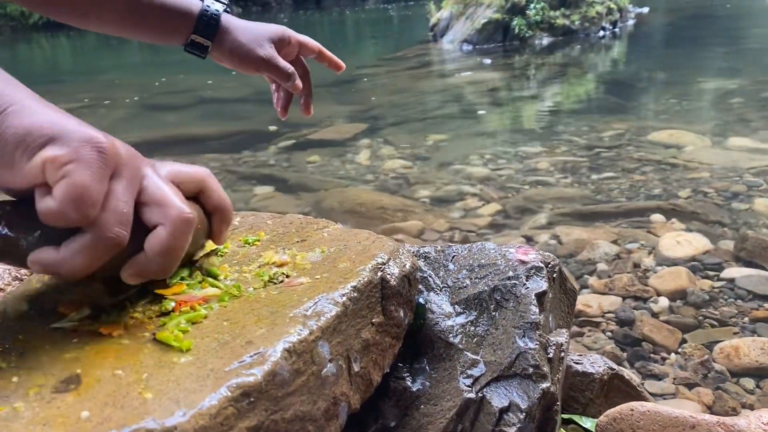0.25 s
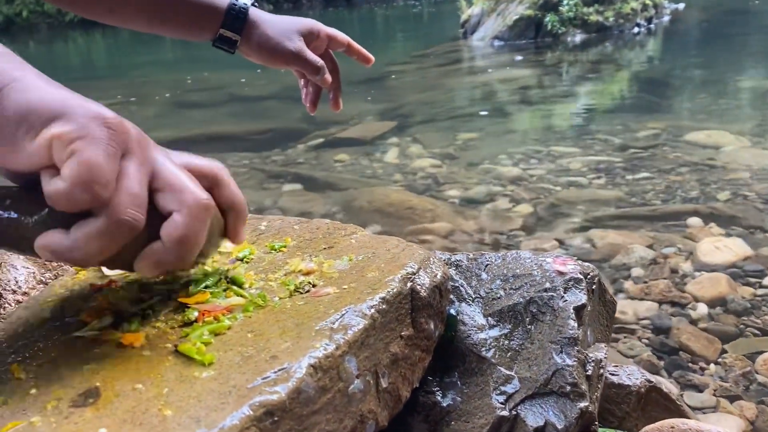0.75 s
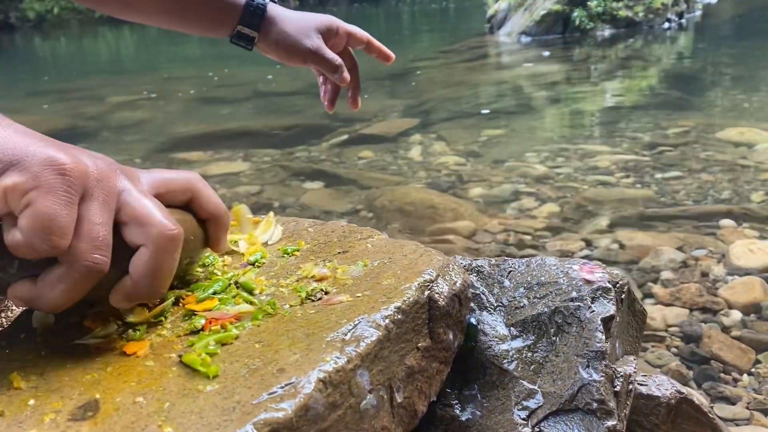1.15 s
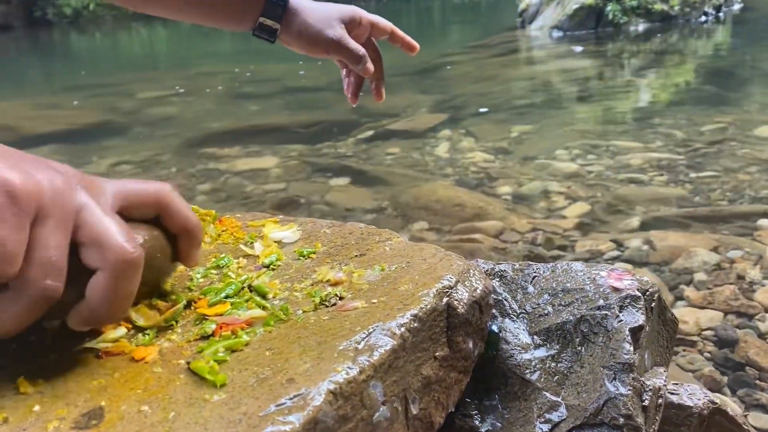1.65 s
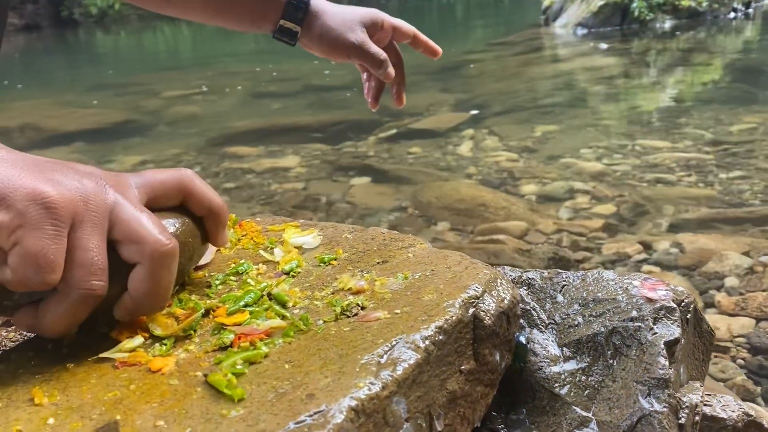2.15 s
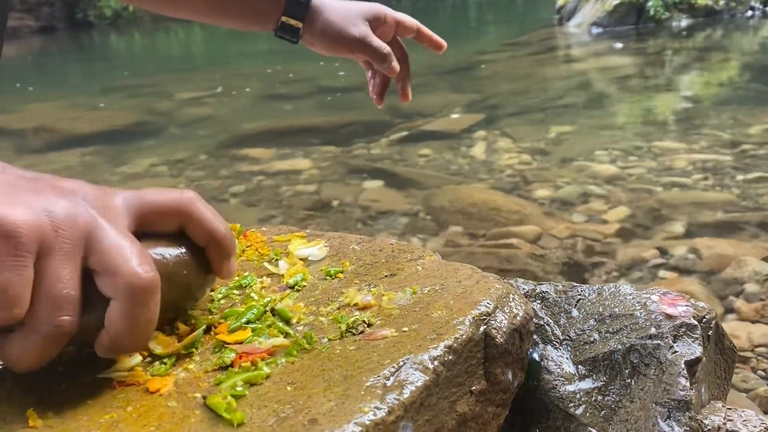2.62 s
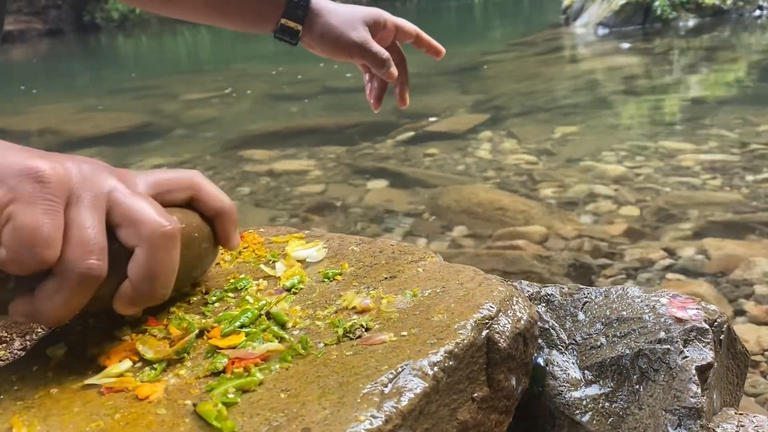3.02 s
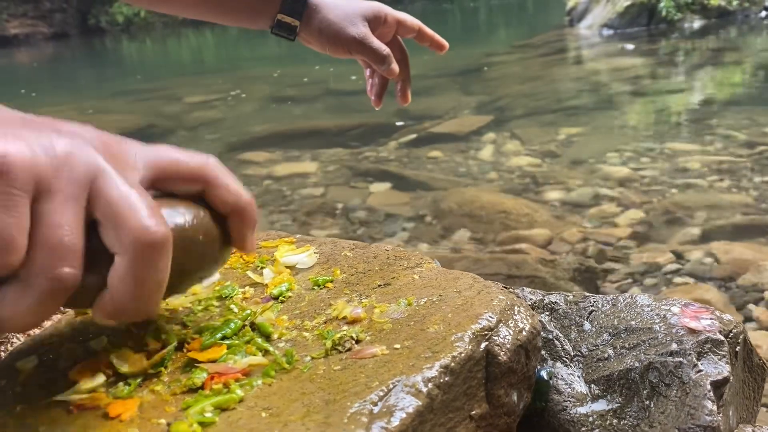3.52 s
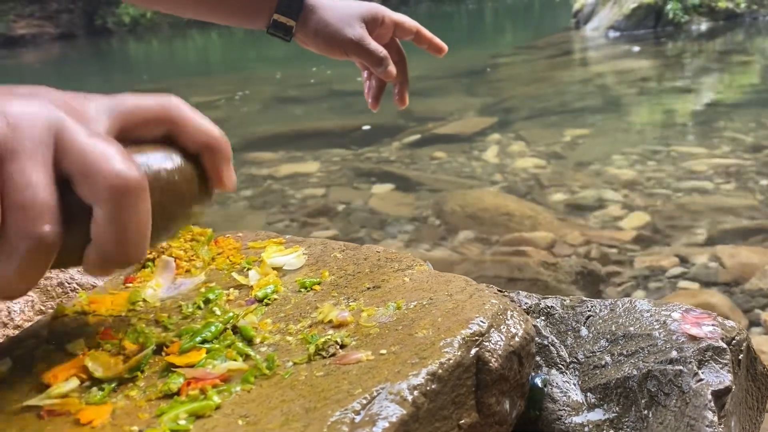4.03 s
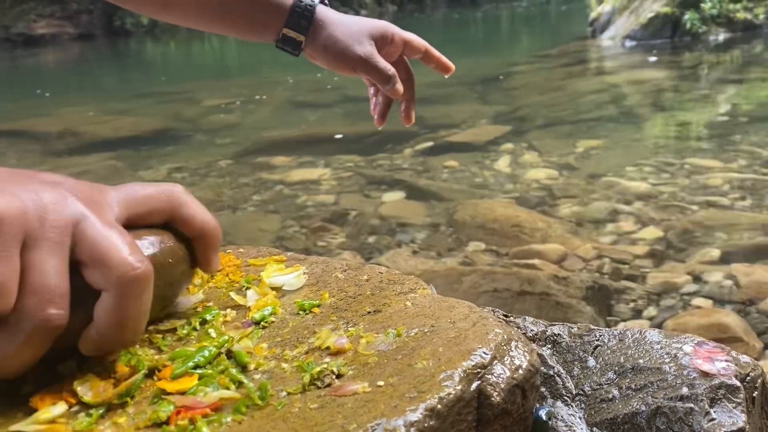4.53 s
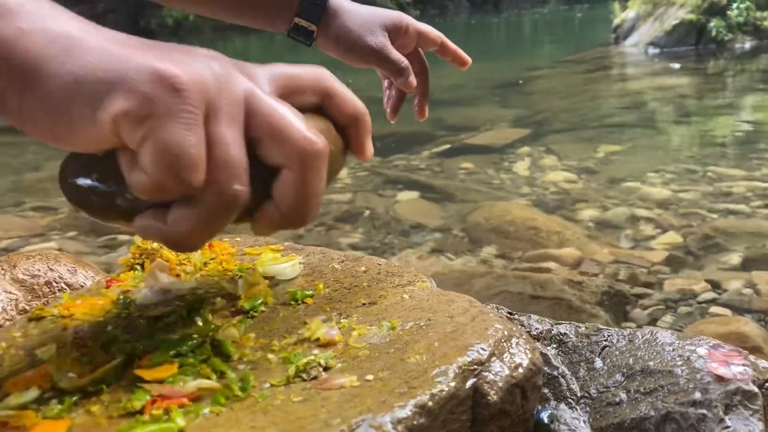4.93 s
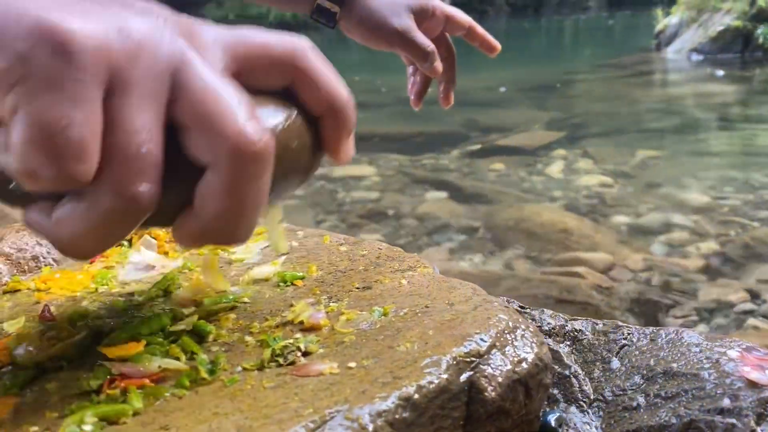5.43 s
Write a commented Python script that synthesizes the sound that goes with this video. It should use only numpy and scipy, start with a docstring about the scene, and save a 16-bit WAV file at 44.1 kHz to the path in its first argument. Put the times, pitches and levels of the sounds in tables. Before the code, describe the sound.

Dull thuds and sharper stone clacks crunch through moist pulp about twice a second, with a low river rumble and insect hiss behind.

```python
"""Stone pounding spices by a river

A hand-held stone pounds fresh spices on a flat rock; a shallow river and shrilling insects lie behind.
Each blow is a noise-burst crunch, a thud falling in pitch, a rocking slab and a clack of ringing modes.
River and chorus are shaped noise; single insects are blurred tones, the drone a narrow noise band.
The hardest blows drive a limiter, so the river sinks and swells back after them."""
import sys
import numpy as np
from scipy import signal
from scipy.fft import rfft, irfft
from scipy.io import wavfile
from scipy.ndimage import uniform_filter1d, minimum_filter1d

SR = 44100
rng = np.random.default_rng(int(sys.argv[2]) if len(sys.argv) > 2 else 0)


def to_wav(s):
    """Save 16-bit WAV."""
    ch = np.atleast_2d(s).T  # columns
    pcm = np.round(np.clip(ch, -1, 1) * 32767)  # PCM
    wavfile.write(sys.argv[1], SR, pcm.astype(np.int16))


N = 250047
TIME = np.arange(N) / SR
FREQ_HZ = np.fft.rfftfreq(N, 1 / SR)


def from_db(db):
    """Decibels to gain."""
    return 10 ** (np.asarray(db) / 20)


def rms_one(x):
    """Scale to unit rms."""
    return x / np.sqrt(np.mean(x ** 2) + 1e-20)


def blend(first, second, share):
    """Go from the first value to the second as share goes from 0 to 1."""
    return first + (second - first) * share


def at_hz(points, size=N):
    """Interpolate a (freq_hz, value) table over log frequency, on the grid of a signal of this size."""
    hz, value = np.transpose(points)
    grid_hz = np.fft.rfftfreq(size, 1 / SR) + 1
    return np.interp(np.log(grid_hz), np.log(hz), value)


def coloured(x, spectrum):
    """Filter by a (freq_hz, level_db) table."""
    size = x.shape[-1]
    return irfft(rfft(x) * from_db(at_hz(spectrum, size)), size)


def pan(balance_db):
    """Left and right gains for a left-minus-right level difference."""
    return from_db(np.array([[.5], [-.5]]) * balance_db)


def stereo(pair, likeness):
    """Two unrelated signals become left and right with the given correlation."""
    c = np.clip(likeness, -1, 1)
    shared = np.sqrt(1 + c) * pair[0]
    opposed = np.sqrt(1 - c) * pair[1] * [[1], [-1]]
    return (shared + opposed) / np.sqrt(2)


def drift(rate_hz):
    """Random wander of unit spread, mostly slower than rate_hz."""
    lowpass = 1 / (1 + (FREQ_HZ / rate_hz) ** 2)
    return rms_one(irfft(rfft(rng.standard_normal(N)) * lowpass, N))


def ring(x, hz, t60_s):
    """Damped two-pole resonance: a unit click sets a mode of height 1 ringing."""
    r = from_db(-60 / (t60_s * SR))
    w = 2 * np.pi * hz / SR
    return signal.lfilter([1, -r * np.cos(w)], [1, -2 * r * np.cos(w), r * r], x + 1e-18)


def clicks(contact_s, level_db):
    """The impulse of a contact."""
    out = np.zeros(N)
    out[int(contact_s * SR)] = from_db(level_db)
    return out


def add(out, sound, centre_s):
    """Mix a short sound in around a moment."""
    start = int(centre_s * SR) - sound.shape[-1] // 2
    out[:, start:start + sound.shape[-1]] += sound


# blows, one bouncing at 2.44 s: contact_s, force_db, crunch_db, crunch_tilt_db_per_octave
BLOWS = [(0.1334, -13, -23.5, 2.5), (0.567, -5, -21, 1.5), (1.0050, -35, -21.5, 0.5),
         (1.5590, -42, -26.5, 4), (2.0116, -18, -15, 4), (2.4359, 5.5, -11, -1), (2.4427, 0, -30, -1),
         (2.8826, -4.5, -17, -1.8), (3.3036, -22, -21, 2), (3.7259, -15, -20.5, -0.5),
         (4.1472, 0, -12.5, .3), (4.545, 7, -9, 0.5), (5.0269, -13.5, -16, 2)]
# stone rubbing and settling in the pulp: centre_s, scuff_db, wet_tick_db, half_length_s
SQUISHES = [(1.027, -50, -39, .004), (1.072, -40.5, -52, 0.0074), (1.125, -37.5, -50, 0.0069),
            (1.153, -42.5, -61, 0.016), (1.571, -45, -46, .004), (5.128, -52, -47, 0.0034)]
# a blow harder than BARE_FORCE_DB squeezes through the paste to bare stone
BARE_FORCE_DB, BARE_RANGE_DB = -1.5, 1.27
PASTE_CONTACT_HZ, BARE_CONTACT_HZ = 1630, 3550  # low-pass of the clack
PASTE_LEAD_S, BARE_LEAD_S = .0018, 0.000885  # crunch centre ahead of stone contact
PASTE_CRUSH_S, BARE_CRUSH_S = .0013, 0.0011  # crunch half-length
PASTE_THUD_RATIO, BARE_THUD_RATIO = 2.08, 2.27  # thud start pitch over THUD_HZ
THUD_HZ = 405.5  # pitch the thud settles on
CLACK_DB, CLACK_GROWTH = -0.5, 1.64  # at force 0 dB; dB per dB of force


def pounding():
    """Force shapes each blow's crunch, thud, rocking and clack; the pulp squishes between; rocks reflect."""
    direct = np.zeros((2, N))
    for contact_s, force_db, crunch_db, tilt_db in BLOWS:
        bare = 1 / (1 + np.exp((BARE_FORCE_DB - force_db) / BARE_RANGE_DB))
        thud_ratio = blend(PASTE_THUD_RATIO, BARE_THUD_RATIO, bare)
        contact_hz = blend(PASTE_CONTACT_HZ, BARE_CONTACT_HZ, bare)
        clack_click = clicks(contact_s, CLACK_DB + CLACK_GROWTH * force_db)
        direct += thud(clicks(contact_s, force_db), THUD_HZ, thud_ratio) * pan(balance_db=-2.5)
        direct += rocking(contact_s, force_db) * pan(balance_db=-5.5)
        direct += clack(clack_click, contact_hz) * pan(balance_db=-2.0)
        pulp = crunch(crunch_db, tilt_db, blend(PASTE_CRUSH_S, BARE_CRUSH_S, bare))
        add(direct, pulp, contact_s - blend(PASTE_LEAD_S, BARE_LEAD_S, bare))
    for centre_s, scuff_db, tick_db, half_length_s in SQUISHES:
        tick = crunch(tick_db, tilt_db=-2.0, half_length_s=half_length_s)
        add(direct, scuff(scuff_db, half_length_s) + tick, centre_s)
    return direct + glance(direct) + scatter(direct, t60_s=0.036, level_db=-8, delay_s=0.00395)


def thud(blow, end_hz, start_ratio, glide_s=.0021, crest_s=.0025, width_s=0.0013):
    """The slab answers with a few cycles that fall in pitch: its higher bending waves arrive first."""
    t = TIME[:SR // 40]
    pitch_hz = end_hz * (1 + (start_ratio - 1) * np.exp(-t / glide_s))
    phase = 2 * np.pi * np.cumsum(pitch_hz) / SR
    onset = 1 - np.exp(-t / 0.00017)
    swell = np.exp(-.5 * ((t - crest_s) / width_s) ** 2) * onset
    return signal.oaconvolve(blow, np.cos(phase) * swell)[:N]


# ring of stone on stone: mode_hz, level_db, t60_s
STONE_MODES = [(1030, -15.5, 0.011), (1310, -15.5, 0.011), (1622, -11.5, 0.0098), (1870, -19.5, 0.0096),
               (2084, -9.5, 0.015), (2380, -13, 0.0091), (2900, -17.5, 0.037), (3100, -24, 0.016),
               (3250, -12, 0.035), (3600, -21, .016)]


def clack(blow, contact_hz, spread_db=0.5):
    """Contact rings the stones, a little differently at each spot; a film of paste takes off the upper modes."""
    modes = np.zeros(N)
    for hz, level_db, t60_s in STONE_MODES:
        modes += from_db(level_db + rng.normal(0, spread_db)) * ring(blow, hz, t60_s)
    lowpass = signal.butter(4, contact_hz, fs=SR, output="sos")
    return signal.sosfilt(lowpass, modes)


# bursting pulp: freq_hz, level_db
CRUNCH = [(700, -10), (1500, -9.5), (2300, -0.5), (4000, -2.5), (6000, 0.5), (7300, 3.5), (9000, -7.5),
          (12500, -0.5), (15000, -3.5), (16500, -17)]


def crunch(level_db, tilt_db, half_length_s, grain_db=5.0, spatter_db=-18, spatter_s=0.0054, likeness=0.93):
    """Cells burst and juice squirts as the gap closes, then a little spatter; 0.1 s, loudest in the middle."""
    t = TIME[:SR // 10] - TIME[SR // 20]
    squeeze = np.exp(-(t / half_length_s) ** 2)
    spatter = from_db(spatter_db) ** 2 * (t > 0) * np.exp(-abs(t) / spatter_s)
    envelope = np.sqrt(squeeze + spatter)  # powers add
    unevenness = np.clip(rng.standard_normal(len(t)), -2, 2)
    grains = rng.standard_normal((2, len(t))) * from_db(grain_db * unevenness)
    colour = [(hz, db + tilt_db * np.log2(hz)) for hz, db in CRUNCH]
    burst = rms_one(coloured(stereo(grains, likeness), colour))
    return from_db(level_db) * envelope * burst


# slab rocking on its bed: mode_hz, level_db, t60_s
SLAB_MODES = [(91, -6.5, 0.11), (178, -3.5, 0.069), (231, -1.5, 0.045), (303.6, 1.5, 0.055)]


def rocking(contact_s, force_db, level_db=-20, growth=0.38, push_hz=500, lag_s=0.00405):
    """The weight of the hand follows each blow and rocks the slab, varying less than the force does."""
    click = clicks(contact_s + lag_s, level_db + growth * force_db)
    push = signal.sosfilt(signal.butter(2, push_hz, fs=SR, output="sos"), click + 1e-18)
    return sum(from_db(db) * ring(push, hz, t60_s) for hz, db, t60_s in SLAB_MODES)


def scuff(level_db, half_length_s, low_hz=470, high_hz=720):
    """Friction through the paste gives a dull rub, a noise band of 470-720 Hz; 0.1 s, loudest in the middle."""
    t = TIME[:SR // 10] - TIME[SR // 20]
    band = signal.butter(2, [low_hz, high_hz], "band", fs=SR, output="sos")
    rub = rms_one(signal.sosfilt(band, rng.standard_normal(len(t))))
    return from_db(level_db) * np.exp(-.5 * (t / half_length_s) ** 2) * rub


def glance(x, left_s=0.00119, right_s=.0028, level_db=-12, low_hz=900):
    """The rock face throws the upper range back, by a different path to each microphone."""
    upper = signal.sosfilt(signal.butter(2, low_hz, "high", fs=SR, output="sos"), x)
    left = np.interp(TIME - left_s, TIME, upper[0])
    right = np.interp(TIME - right_s, TIME, upper[1])
    return from_db(level_db) * np.array([left, right])


# dull scatter from the ground and rocks around: freq_hz, level_db
SCATTER = [(60, -9), (160, -8), (320, 5.5), (600, -8), (900, -3.5), (3000, -1), (12000, -25)]


def scatter(x, t60_s, level_db, delay_s):
    """The stony bank returns a short dull tail of decaying noise."""
    t = TIME[:SR // 4]
    echoes = coloured(stereo(rng.standard_normal((2, len(t))), 0.46), SCATTER)
    fade = from_db(-60 * t / t60_s) * (t > delay_s)
    tail = echoes * fade / np.sqrt(np.sum(fade ** 2))
    return from_db(level_db) * signal.fftconvolve(x, tail, axes=1)[:, :N]


# river spectrum: freq_hz, level_db_per_hz
RIVER = [(20, -127), (45, -70), (78, -58.5), (130, -62.5), (200, -62), (340, -67.5), (460, -71.5),
         (600, -74), (1050, -79), (2100, -81), (3600, -85.5), (6500, -86.5), (9500, -101), (16000, -114)]
# river width: freq_hz, left_right_correlation
RIVER_LIKENESS = [(60, 0.8), (140, 0.93), (300, 0.24), (520, 0.5), (750, -0.29), (1600, -0.11),
                  (2400, 0.37), (7000, 0.26)]
# river position: freq_hz, left_minus_right_db
RIVER_BALANCE = [(40, -3), (130, -1), (350, -4), (600, -.5), (1000, -3), (2000, -1), (5000, -5.5),
                 (9000, 9)]


def river(rumble_db=0.82, ripple_db=0.55, split_hz=500):
    """Distant rapids: a lumpy rumble under a smooth wash that ripples slightly."""
    water = stereo(rfft(rng.standard_normal((2, N))), at_hz(RIVER_LIKENESS))
    water = water * from_db(at_hz(RIVER)) * pan(at_hz(RIVER_BALANCE)) * np.sqrt(SR / 2)
    low = 1 / (1 + (FREQ_HZ / split_hz) ** 4)
    rumble = irfft(water * low, N) * from_db(rumble_db * drift(16))
    wash = irfft(water * (1 - low), N) * from_db(ripple_db * drift(32))
    return rumble + wash


# steady insect chorus: freq_hz, level_db_per_hz
CHORUS = [(6000, -108), (6750, -81.5), (7200, -80), (7800, -78.5), (8700, -100), (10200, -103.5),
          (11300, -90), (11900, -90.5), (12800, -93.5), (13400, -90.5), (14600, -104), (16000, -110)]
# single calls, silent if end precedes start: start_s, end_s, start_pitch_hz, level_db
INSECT_CALLS = [(-1.6, 1.17, 12015, -61.5), (-1, .15, 5460, -53), (1.6, 2.5, 2975, -55.5),
                (2, 2.63, 5460, -56.5), (2.48, 5.05, 12005, -58.5), (2.62, 3.12, 3090, -56.5),
                (3.5, 3.3, 6200, -61), (5, 5.8, 2975, -55)]


def insects():
    """The hiss of the chorus and a steady buzz; single insects fade in and out within them."""
    hiss = coloured(rng.standard_normal(N), CHORUS) * np.sqrt(SR / 2)
    calls = sum(insect(*call) for call in INSECT_CALLS)
    return hiss + calls + drone() * pan(balance_db=-3.5)


CALL_RISE_HZ, CALL_SETTLE_S = 200, 1.3  # every call creeps up and levels off
LOW_CALL_WIDTH_HZ, HIGH_CALL_WIDTH_HZ = 55, 5  # lowest calls raspy, highest pure


def insect(start_s, end_s, start_hz, level_db, fade_s=0.049):
    """A thin shrill note that rises and settles as the call goes on, blurred by the trees."""
    age_s = np.maximum(TIME - start_s, 0)
    pitch_hz = start_hz + CALL_RISE_HZ * (1 - np.exp(-age_s / CALL_SETTLE_S))
    phase = 2 * np.pi * np.cumsum(pitch_hz) / SR
    pitches = [hz for _, _, hz, _ in INSECT_CALLS]
    width_hz = np.interp(start_hz, [min(pitches), max(pitches)], [LOW_CALL_WIDTH_HZ, HIGH_CALL_WIDTH_HZ])
    knots_s = np.arange(0, TIME[-1], .5 / width_hz)
    shape = (2, len(knots_s))
    # random complex gain: blurs level and phase
    blur = stereo(rng.standard_normal(shape) + 1j * rng.standard_normal(shape), 0.85)
    note = np.array([np.interp(TIME, knots_s, side) for side in blur]) * np.exp(1j * phase)
    fade = np.clip(np.minimum(age_s, end_s - TIME) / fade_s, 0, 1)
    return from_db(level_db) * fade * rms_one(note.real)


def drone(level_db=-54, hz=4270, width_hz=140):
    """Many far insects of one kind merge into a steady narrow buzz."""
    band = 1 / (1 + ((FREQ_HZ - hz) / width_hz) ** 2)
    buzz = stereo(rfft(rng.standard_normal((2, N))), 0.29) * band
    return from_db(level_db) * rms_one(irfft(buzz, N))


def scene():
    """The pounding close by, river and forest behind."""
    return pounding() + river() + insects()


def treble_lag(x, above_hz=6000, lag_s=0.00016):
    """Above above_hz the right channel lags the left by lag_s."""
    late = np.exp(-2j * np.pi * lag_s * np.maximum(FREQ_HZ - above_hz, 0))
    return np.array([x[0], irfft(rfft(x[1]) * late, N)])


def limiter(x, ceiling_db=-1.0, hold_s=0.1, release_db_per_s=115, ahead_s=0.002):
    """The gain drops just ahead of a peak, holds, then climbs back."""
    over_db = np.maximum(20 * np.log10(abs(x).max(axis=0) + 1e-9) - ceiling_db, 0)
    half_hold = int(hold_s * SR) // 2
    ahead = max(int(ahead_s * SR), 2)
    held_db = -minimum_filter1d(-over_db, 2 * half_hold + 1, origin=half_hold, mode="constant")
    release_db = release_db_per_s * TIME
    cut_db = np.maximum.accumulate(held_db + release_db) - release_db
    early_db = np.pad(cut_db[ahead:], (0, ahead))
    return x * from_db(-uniform_filter1d(early_db, ahead))


CUTOFF_HZ = 16900


def record(dry):
    """Treble lag, limiter, then a steep low-pass at CUTOFF_HZ."""
    lowpass = signal.cheby2(12, 70, CUTOFF_HZ, fs=SR, output="sos")
    return signal.sosfilt(lowpass, limiter(treble_lag(dry)))


dry = scene()
out = record(dry)
to_wav(out)
```